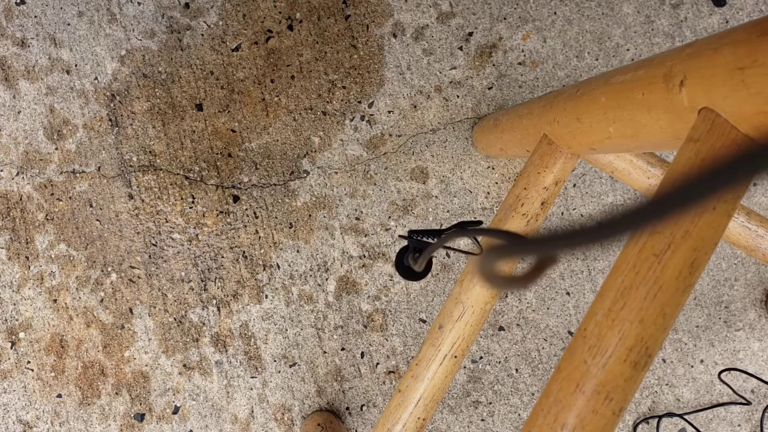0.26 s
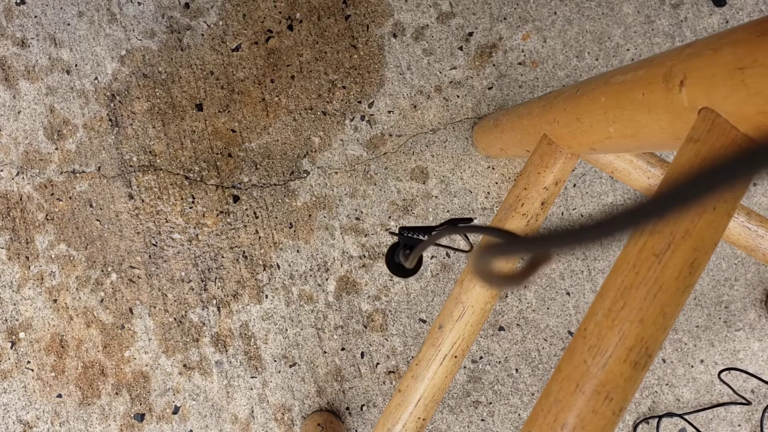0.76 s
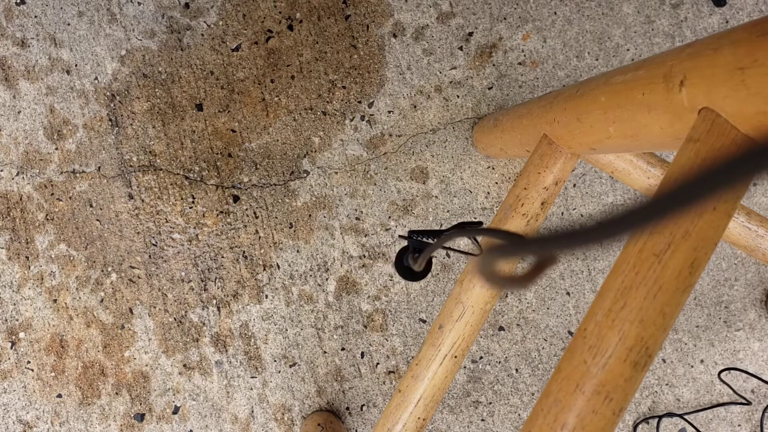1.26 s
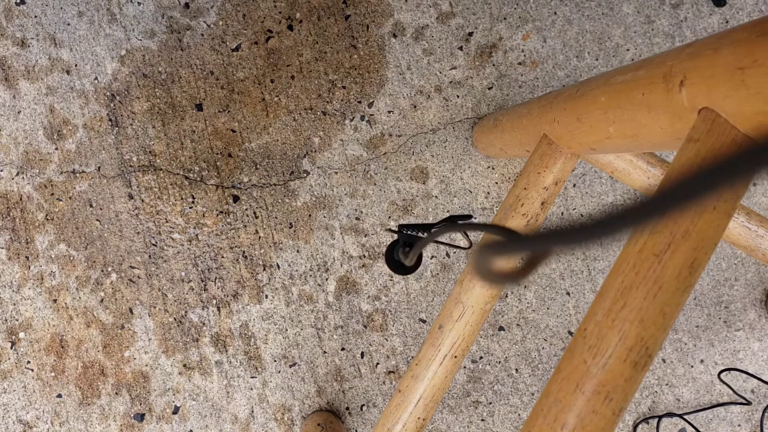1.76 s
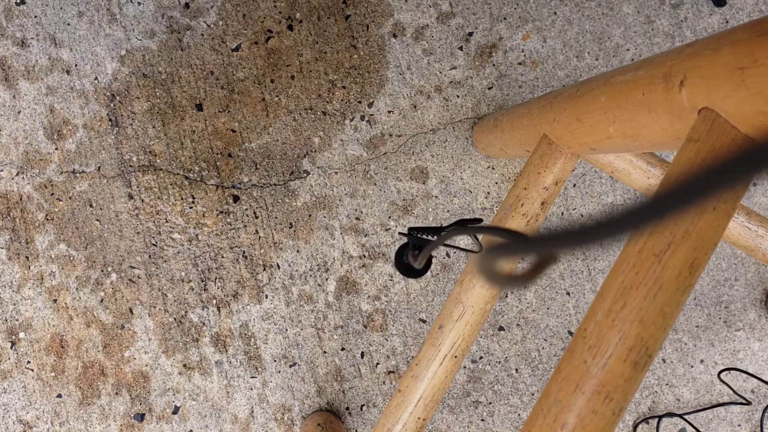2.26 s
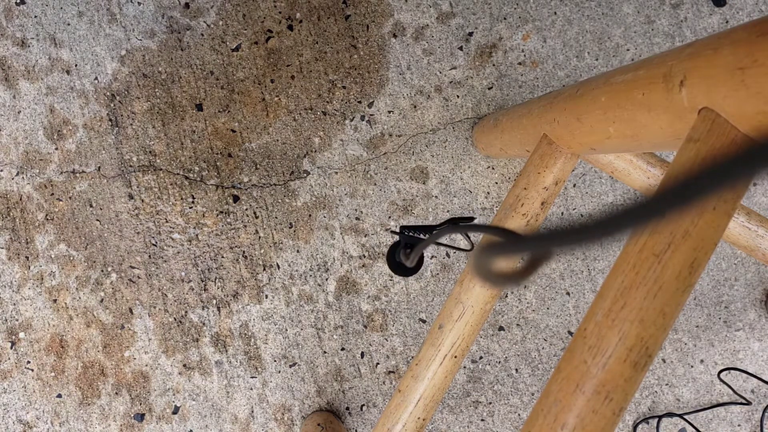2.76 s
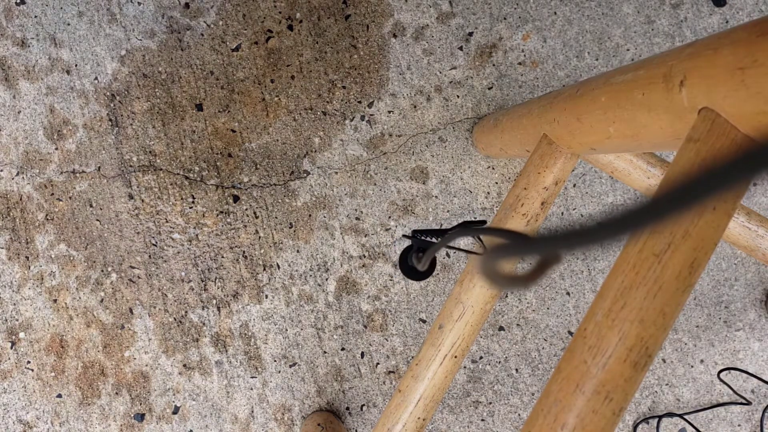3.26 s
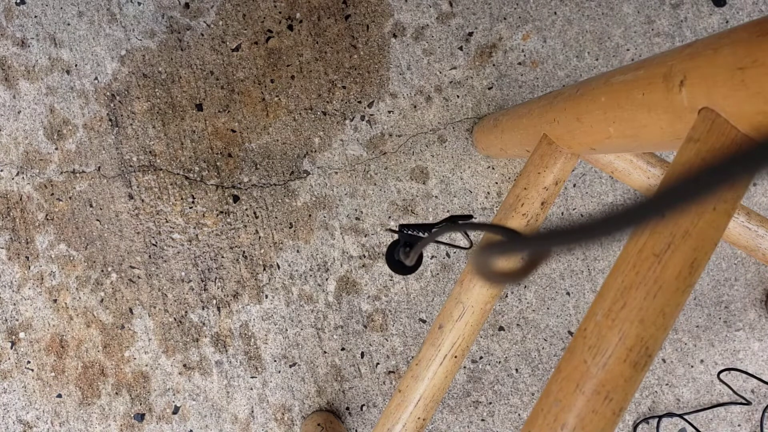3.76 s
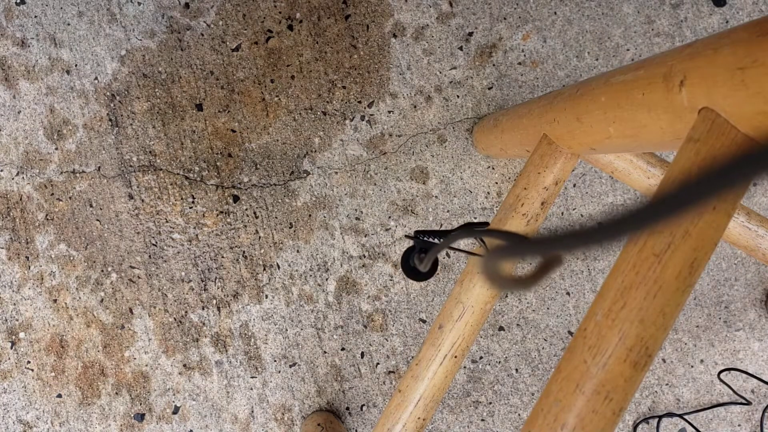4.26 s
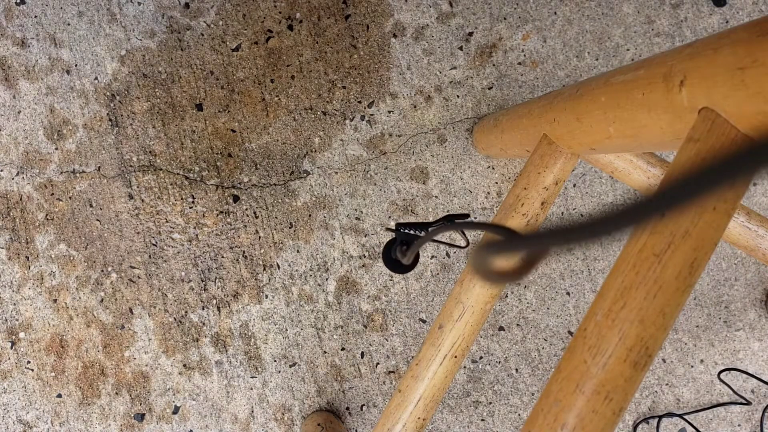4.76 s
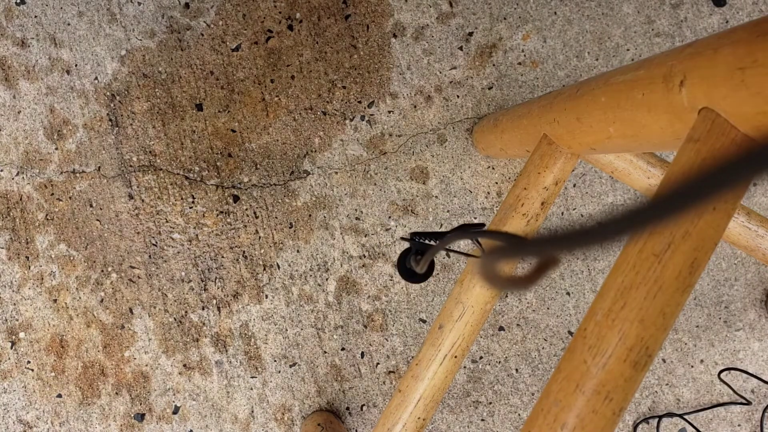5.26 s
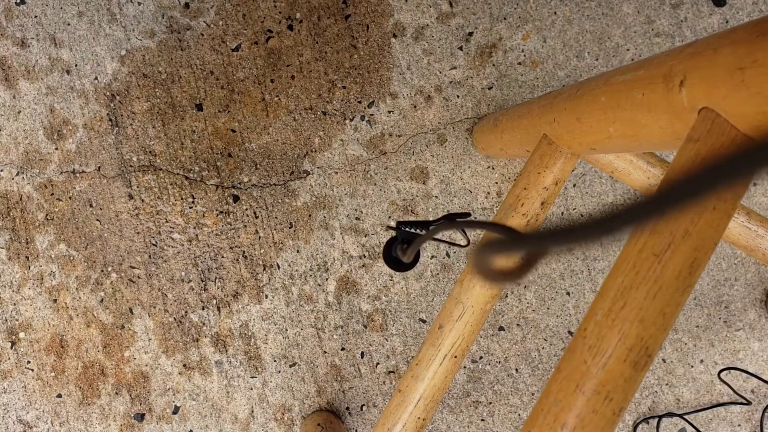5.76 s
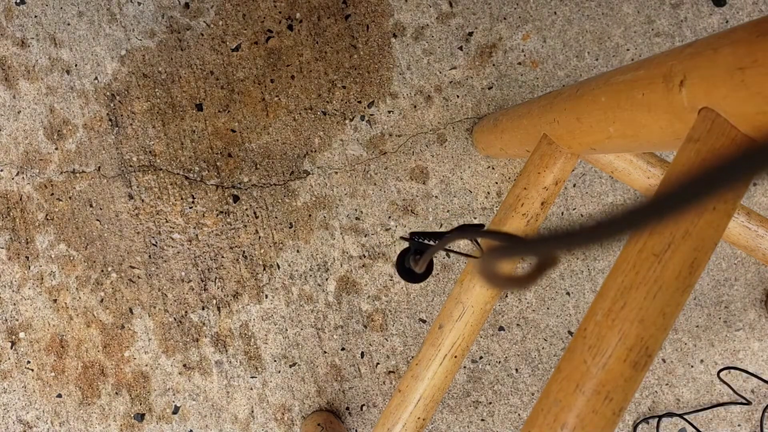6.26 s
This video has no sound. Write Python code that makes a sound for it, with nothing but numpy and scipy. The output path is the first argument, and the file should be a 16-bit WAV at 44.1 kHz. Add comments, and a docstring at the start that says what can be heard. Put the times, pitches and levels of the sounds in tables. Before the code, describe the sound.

A V8 idles with a lumpy, misfiring exhaust, then sags almost to a stall amid muffled pops before pulling up again.

```python
"""A V8 idles in a garage; one cylinder misfires now and then and thumps the exhaust.
The engine sags almost to a stall, a spark snaps at a loose plug lead, and the speed picks up again.
Each firing is a click that booms through the silencer's filter and barks through the pipes' resonances.
Around it lie pops, gas and a shell murmur, then filtered noise for the rush and the ticking valves,
a thin pulley tone that swells and fades, and the sparse echoes of the garage."""
import sys
import numpy as np
from scipy import signal
from scipy.fft import rfft, irfft, next_fast_len
from scipy.io import wavfile
from scipy.ndimage import uniform_filter1d

SR = 44100
rng = np.random.default_rng(int(sys.argv[2]) if len(sys.argv) > 2 else 0)


def generate_wav(signal):
    """Clip the signal to [-1, 1] and save it as 16-bit WAV at the path in sys.argv[1]."""
    frames = np.transpose(np.atleast_2d(signal))
    scaled = np.clip(frames, -1, 1) * 32767
    pcm = np.round(scaled).astype(np.int16)
    wavfile.write(sys.argv[1], SR, pcm)


N = 287091
T = np.arange(N) / SR  # s

# Engine speed before the sag of each misfire: (time [s], speed [firings/s])
ENGINE_SPEED = [(0.0, 71.13), (0.68, 71.25), (1.08, 72.05), (2.33, 71.89), (2.69, 71.24), (3.47, 71.81),
                (3.7, 61.69), (3.93, 54.4), (4.17, 45.47), (4.35, 42.68), (4.59, 38.23), (4.96, 34.14),
                (5.26, 39.1), (5.62, 39.62), (5.84, 34.91), (6.24, 36.85), (6.51, 45.2)]
# Strength of combustion, starved in the stumble and hard as the engine pulls up: (time [s], effort [dB])
COMBUSTION_EFFORT = [(0, 0.5), (3.45, 0), (3.75, -2.5), (4.03, 0), (4.13, -2), (4.6, -1), (5.05, -1.5),
                     (5.25, -1), (5.7, 0), (5.85, -0.5), (6.08, 3.5), (6.22, 2.5), (6.33, 5.5), (6.5, 6.5)]
# Cylinders in firing order: (puff lag [firings], puff size [ratio], crack lag [firings], crack level [dB],
# crack brightness [Hz], level of its echo in the pipe [dB], bank [0 left, 1 right])
CYLINDERS = [(.06, 1.06, -.1, 1.2, 172, 1.3, 0), (-.16, .38, -.123, 5.3, 2000, -27, 0),
             (.05, 1.49, .23, 13.1, 162, -12, 1), (-.12, 1.06, .231, 3.6, 726, -24, 1),
             (-.17, .98, .192, 13.6, 385, -29, 1), (.02, 1.34, -.016, .4, 159, -.5, 0),
             (-.19, 1.01, -.118, 4.8, 1100, -3.5, 0), (0, .64, .233, .7, 403, -25, 1)]
# Misfires of the weak cylinder; a negative share sucks gas back: (time [s], share of a full thump [ratio])
MISFIRES = [(.34, 1), (1.02, 1), (1.25, 1), (1.59, 1), (2.825, 1), (2.94, 1), (3.4, 1), (3.52, 1),
            (3.65, .75), (3.93, .5), (4.09, 1), (4.47, 1), (4.685, .5), (4.92, -.5), (5.15, .5)]
# Firings that fail or burn hard in the stumble: (time [s], puff size [ratio])
STUMBLES = [(3.612, 0.75), (3.679, 1.0), (3.723, 1.0), (3.819, 1.0), (3.863, 1.25), (3.956, 1.0),
            (3.987, 0.5), (4.073, 1.5), (4.093, 2.0), (4.138, 0.75), (4.182, 0.4), (4.208, 1.5),
            (4.237, 1.25), (4.275, 0.8), (4.468, 2.0), (4.682, 1.5), (4.913, 1.5), (5.039, 1.0),
            (5.774, 1.25), (5.864, 1.25), (5.98, 0.75), (6.036, 1.5), (6.089, 1.25), (6.144, 0.75),
            (6.385, 1.0), (6.499, 1.25)]
# How a layer's level grows: (per dB of speed [dB/dB], per dB of effort [dB/dB])
BOOM_LAW = (1, 0.88)
BARK_LAW = (2.55, 1.05)
RUSH_LAW = (1.55, 0.56)
VALVE_LAW = (0.11, 0.46)

# Boom spectrum of the silencer: (frequency [Hz], gain [dB])
SILENCER_BOOM = [(15, -21), (30, -14), (42, 8), (52, 12), (61, 16.5), (70, 11.5), (80, 8.5), (95, -1.5),
                 (120, -32.5), (160, -23)]
# Resonances of each bank's exhaust pipe: (frequency [Hz], width [Hz], gain [dB])
LEFT_PIPE = [(141, 110, 2.5), (199, 16.5, 18), (228.6, 23, 13), (339.3, 17.7, 9.5), (342.3, 57.6, 10.5),
             (432.3, 22, 5), (509.6, 17.2, 7), (637, 25, -6), (707.4, 23.7, 1.8), (803.4, 28, -2.7),
             (851, 41, -1.5), (995, 23, -9), (1098, 9.9, -15.5)]
RIGHT_PIPE = [(175.44, 16.04, 18.5), (175, 27.3, 15), (236.7, 21.4, 2.5), (260.8, 22, -0.8),
              (385.9, 15.3, 14.5), (391.4, 33.7, 14), (496, 21, -7), (618.5, 34, -2.5), (750, 6, -6),
              (794, 76, 2.5), (824, 98, -1), (910, 21, -5), (1113, 12, -15.5)]
# Thin ring of the tailpipe that both banks share: (frequency [Hz], width [Hz], gain [dB])
TAILPIPE = [(1449, 36, -12)]
# Bark level on top of what speed and effort give: (time [s], level [dB])
BARK_LEVEL = [(0, 1), (2.7, 1), (3.1, 1), (3.4, 1), (3.62, 1), (3.82, -4.5), (3.95, 1), (4.05, -4.5),
              (4.15, -8), (4.9, -3), (5.3, -0.5), (5.6, -0.5), (5.85, -4), (6.1, -1.5), (6.3, -3.5),
              (6.44, -2), (6.5, -1.5)]
# Unburnt fuel popping in the pipe: (time [s], level [dB])
POPS = [(3.366, -7), (3.524, 2), (3.598, -11), (3.648, -0.5), (3.733, -2), (3.766, -3), (3.824, -1.5),
        (3.875, -2), (3.908, -12), (3.958, -7.5), (3.996, -12), (4.028, -8), (4.057, -5.5), (4.211, -11),
        (4.28, -8), (4.581, -13.5), (4.636, -13.5), (4.921, -15), (5.279, -16), (5.347, -14), (5.49, -9.5),
        (5.64, -14), (5.983, -16), (6.065, -12), (6.2, -15), (6.283, -8.5), (6.347, -6), (6.478, 2.5)]
# Ring of the whole exhaust after a pop: (frequency [Hz], width [Hz], gain [dB])
POP_RING = [(159, 9.6, 17), (246, 30, 0), (323, 14, 12.5), (404, 18, 17.5), (431, 82, 1.5), (530, 35, -1.5),
            (702, 78, -1), (793, 24, 4), (905, 60, -5.5)]
# Hiss of escaping gas: (frequency [Hz], density [dB per Hz])
GAS_HISS = [(500, -26.5), (1100, -2), (1450, 9), (2000, -4.5), (3000, -5), (5000, -11.5), (10000, -22)]
# Modes of the silencer's shell: (frequency [Hz], width [Hz], gain [dB])
SILENCER_SHELL = [(112, 16, 3.5), (165.2, 18, -1), (195, 33, -5), (231, 22, 1), (317, 18, -6)]
# Level of the shell's murmur: (time [s], level [dB])
MURMUR_LEVEL = [(3.5, -44), (4.0, -39), (4.25, -47), (4.45, -37.5), (4.7, -47), (4.95, -52), (5.1, -42),
                (5.3, -35.5), (5.5, -34.5), (5.68, -41), (5.88, -44), (6.1, -39.5), (6.3, -34.5),
                (6.5, -33)]

# Sparks at the plug lead: (time [s], level [dB], centre of the sizzle [Hz])
SPARKS = [(4.448, -50, 7000), (4.6805, -39.5, 3020), (4.683, -42, 9000), (4.687, -46, 6500)]
# Tone of the snaps in the engine bay: (frequency [Hz], gain [dB])
SPARK_TONE = [(500, -4), (1100, -8), (1550, 4.0), (2200, -5.5), (3000, -9), (8000, -9.5), (11000, -17)]
# Ring of the engine block and covers: (frequency [Hz], width [Hz], gain [dB])
ENGINE_BLOCK = [(141, 59, -4), (175, 6.3, 4), (233, 14, 5), (335, 66, 7), (415, 12, 8), (583.7, 13.3, 7.5),
                (816, 32, 1), (1030, 190, -14.5), (1434, 42, -4.5), (1740, 55, -6.5), (1928, 63, -6),
                (2134, 132, -8.5), (3130, 130, -20.5)]
# Rush of fan and belts: (frequency [Hz], density [dB per Hz])
AIR_RUSH = [(100, 13), (400, 18.5), (1000, 18.5), (1700, 7.5), (2200, 8.5), (2900, 8.5), (3500, 5.5),
            (5000, 1.5), (7000, -1.5), (9000, -5), (11000, -13.5)]
# Decay of the garage: (frequency [Hz], time to fall by 60 dB [s])
GARAGE_DECAY = [(100, 0.72), (1000, 0.74), (4000, 0.032), (10000, 0.031)]

IDLE_HZ, START_FIRINGS = 71, .97  # smooth idle in firings per second; crank position at the start
# A lost power stroke slows the crank, starting just before its thump leaves the exhaust.
SAG_SHARE, SAG_S, SAG_LEAD_S = .04, .08, .06
WEAK_CYLINDER, THUMP_SIZE = 1, 2.15  # row of CYLINDERS; puff size of a full thump
ECHO_S = .00672  # round trip of a crack to the silencer and back
WHINE_PER_FIRING = 27.27  # cycles of the pulley tone in one firing
EDGE_HZ = 11300  # upper band edge of the recorder


def gain_of(db):
    """Amplitude ratio of a level in dB."""
    return 10 ** (np.asarray(db) / 20)


def evened(x):
    """Scales x to an RMS of one."""
    return x / np.sqrt(np.mean(x ** 2) + 1e-20)


def read(points, hz):
    """A spectrum table on a log-frequency axis."""
    f, value = np.transpose(points)
    return np.interp(np.log(hz + 1), np.log(f), value)


def curve(rows, s):
    """A table of (time, value) at the times s."""
    return np.interp(s, *np.transpose(rows))


def clicks(times, sizes):
    """A train of single-sample clicks."""
    places = np.clip(np.round(times * SR), 0, N).astype(int)
    return np.bincount(places, sizes, N + 1)[:N]


def coloured(x, points, top_hz=SR):
    """Causal filter with the given spectrum, rolled off steeply above top_hz."""
    size = 2 * next_fast_len(N // 2 + SR // 2)
    hz = np.fft.rfftfreq(size, 1 / SR)
    log_gain = np.log(gain_of(read(points, hz)))
    # the Hilbert transform of the log gain gives the minimum phase
    mirrored = np.r_[log_gain, log_gain[-2:0:-1]]
    response = np.exp(np.conj(signal.hilbert(mirrored)))[:len(hz)]
    roll_off = 1 + (hz / top_hz) ** 10
    return irfft(rfft(x, size) * response / roll_off, size)[:N]


def ring(x, modes):
    """Passes x through a set of damped resonances; neighbours swing in opposite senses."""
    t = T[:SR // 4]
    response = np.zeros(len(t))
    for k, (hz, width, db) in enumerate(modes):
        decay = np.exp(-np.pi * width * t)
        response += (-1) ** k * gain_of(db) * width * decay * np.sin(2 * np.pi * hz * t)
    return signal.oaconvolve(x, response)[:N]


def speed():
    """Firings per second: the crank sags after each misfire and recovers."""
    since = [np.maximum(T - s + SAG_LEAD_S, 0) / SAG_S for s, _ in MISFIRES]
    sag = sum(u * np.exp(1 - u) for u in since)
    return curve(ENGINE_SPEED, T) * (1 - SAG_SHARE * sag)


def crank():
    """Position of the crankshaft, counted in firings."""
    return START_FIRINGS + np.cumsum(speed()) / SR


def loudness(turn, law):
    """Level of a layer against the smooth idle, in dB, from speed and effort."""
    per_speed, per_effort = law
    speed_db = 20 * np.log10(np.gradient(turn) * SR / IDLE_HZ)
    return per_speed * speed_db + per_effort * curve(COMBUSTION_EFFORT, T)


def firings(turn):
    """Number of each firing, then its cylinder's columns."""
    number = np.arange(1, int(turn[-1]) + 1)
    return number, *np.array(CYLINDERS)[number % len(CYLINDERS)].T


def boom(turn, level_db=29.5, top_hz=125):
    """Each cylinder puffs into the silencer; when the weak one misfires, its small puff becomes a thump."""
    number, lag, size, *_ = firings(turn)
    times = np.interp(number + lag, turn, T)
    weak = np.flatnonzero(number % len(CYLINDERS) == WEAK_CYLINDER)
    for s, share in MISFIRES:
        size[weak[np.argmin(abs(times[weak] - s))]] = share * THUMP_SIZE
    # a stumble takes over the nearest firing, in time and in size
    for s, puff in STUMBLES:
        nearest = np.argmin(abs(times - s))
        times[nearest], size[nearest] = s, puff
    push = gain_of(np.interp(times, T, loudness(turn, BOOM_LAW)))
    return gain_of(level_db) * coloured(clicks(times, size * push), SILENCER_BOOM, top_hz)


def bark(turn, level_db=-63, slack_s=0.023, slack_db=-6, gas_db=-43, gas_s=0.017, soft_hz=450,
         sharp_at_db=-3, softening=0.81, round_db=-14, round_hz=260, uneven_db=1.0, low_hz=100, top_hz=1750):
    """Each pulse's sharp front, echo and spit of gas ring its bank's pipe; the uneven order makes the lope."""
    number, _, _, lag, crack_db, *_ = firings(turn)
    times = np.interp(number + lag, turn, T)
    # a misfire leaves the pipe slack, so the next few cracks are weaker
    slack = sum(np.exp(-((times - s - slack_s) / slack_s) ** 2) for s, _ in MISFIRES)
    uneven = uneven_db * rng.standard_normal(len(number))
    sizes = gain_of(crack_db + slack_db * slack + uneven)
    gas_decay = np.exp(-T[:SR // 20] / gas_s)
    banks = np.zeros((2, N))
    for k, (*_, bright_hz, echo_db, bank) in enumerate(CYLINDERS):
        own = sizes * (number % len(CYLINDERS) == k)
        fronts = clicks(times, own) + clicks(times + ECHO_S, own * gain_of(echo_db))
        gas = signal.oaconvolve(fronts, gas_decay)[:N] * rng.standard_normal(N)
        pulse = fronts + gain_of(gas_db) * gas
        banks[int(bank)] += signal.lfilter(*signal.butter(1, bright_hz, fs=SR), pulse)
    pipe = ring(banks[0], LEFT_PIPE) + ring(banks[1], RIGHT_PIPE) + ring(banks.sum(0), TAILPIPE)
    # weak combustion makes rounder fronts, and so a duller, fuller bark
    bark_db = loudness(turn, BARK_LAW) + curve(BARK_LEVEL, T)
    sharp = np.minimum(gain_of(softening * (bark_db - sharp_at_db)), 1)
    dull = signal.sosfiltfilt(signal.butter(2, soft_hz, fs=SR, output="sos"), pipe)
    body = gain_of(round_db) * signal.sosfiltfilt(signal.butter(2, round_hz, fs=SR, output="sos"), pipe)
    blend = dull + (1 - sharp) * body + sharp * (pipe - dull)
    band = signal.butter(4, [low_hz, top_hz], "bandpass", fs=SR, output="sos")
    return signal.sosfiltfilt(band, gain_of(level_db + bark_db) * blend)


def pops(level_db=-63, bright_hz=900, brightening=0.29):
    """Late burns knock the exhaust; the harder the pop, the brighter."""
    fronts = np.zeros(N)
    for s, db in POPS:
        knock = clicks(np.array([s]), [gain_of(db)]) + 1e-18  # tiny offset keeps the filter off denormals
        edge_hz = bright_hz * gain_of(brightening * db)
        fronts += signal.lfilter(*signal.butter(1, edge_hz, fs=SR), knock)
    return gain_of(level_db) * ring(fronts, POP_RING)


def spit(turn, level_db=-52, spit_s=0.0054, uneven_db=3):
    """Every stroke forces out a short, gritty spit of gas, which sinks away at low speed."""
    number, _, _, lag, *_ = firings(turn)
    sizes = gain_of(uneven_db * rng.standard_normal(len(number)))
    strokes = clicks(np.interp(number + lag, turn, T), sizes)
    gas = signal.oaconvolve(strokes, np.exp(-T[:SR // 20] / spit_s))[:N] * rng.standard_normal(N)
    return evened(coloured(gas, GAS_HISS)) * gain_of(level_db + loudness(turn, BARK_LAW))


def murmur(turn, uneven_db=4.0):
    """Each puff shakes the modes of the silencer's shell: a soft murmur that swells and dips."""
    number, lag, size, *_ = firings(turn)
    uneven = gain_of(uneven_db * rng.standard_normal(len(number)))
    knocks = clicks(np.interp(number + lag, turn, T), size * uneven)
    return gain_of(curve(MURMUR_LEVEL, T)) * evened(ring(knocks, SILENCER_SHELL))


def sparks(rise_s=0.0007, snap_s=0.015, crack_s=0.0014, crack_db=7, grain_db=4, sizzle_db=2):
    """Dry snaps of gritty noise with a resonant sizzle, a fast crack and a slower fade."""
    t, out = T[:SR // 8], np.zeros(N)
    decay = np.exp(-t / snap_s) + gain_of(crack_db) * np.exp(-t / crack_s)
    fade = (1 - np.exp(-t / rise_s)) * decay
    for s, db, hz in SPARKS:
        grain = gain_of(grain_db * rng.standard_normal(len(t)))
        grit = evened(rng.standard_normal(len(t)) * grain)
        sizzle = signal.lfilter(*signal.iirpeak(hz, 2, fs=SR), grit)
        out[round(s * SR):][:len(t)] += gain_of(db) * fade * (grit + gain_of(sizzle_db) * sizzle)
    return coloured(out, SPARK_TONE)


def valves(turn, level_db=-43, uneven_db=3, rattle_s=0.022, steady=0.84):
    """Two valves seat in each firing and rattle the block, over a steady bed of noise through its ring."""
    times = np.interp(np.arange(1, turn[-1], .5), turn, T)
    taps = clicks(times, gain_of(uneven_db * rng.standard_normal(len(times))))
    rattle = steady + signal.oaconvolve(taps, np.exp(-T[:SR // 20] / rattle_s))[:N]
    ticking = evened(ring(rattle * rng.standard_normal(N), ENGINE_BLOCK))
    return ticking * gain_of(level_db + loudness(turn, VALVE_LAW))


def whine(turn, level_db=-58, waver_db=2, swell_db=7, swell_at_s=2.14, swell_s=0.19, end_s=2.8, release_s=.12):
    """A thin tone from a belt-driven pulley, locked to the crank: it wavers, swells once and dies away."""
    waver = evened(uniform_filter1d(rng.standard_normal(N), SR // 12))
    swell = np.exp(-((T - swell_at_s) / swell_s) ** 2)
    release = np.exp(-np.maximum(T - end_s, 0) / release_s)
    level = release * gain_of(level_db + swell_db * swell + waver_db * waver)
    return level * np.sin(2 * np.pi * WHINE_PER_FIRING * turn)


def rush(turn, level_db=-42.5, surge_db=1.0):
    """Air from fan and belts: coloured noise, surging once in each engine cycle."""
    surge = np.sin(2 * np.pi * turn / len(CYLINDERS))
    air = evened(coloured(rng.standard_normal(N), AIR_RUSH))
    return air * gain_of(level_db + loudness(turn, RUSH_LAW) + surge_db * surge)


def garage(x, first_s=0.00522, spacing=20):
    """Sparse reflections of random sign, each band dying at its own speed; spacing in samples."""
    count = SR // 40
    times = (np.arange(count) + rng.random(count)) * spacing / SR + first_s
    taps = clicks(times, rng.choice([-1., 1.], count))[:SR // 2]
    hz, t, z = signal.stft(taps, SR, nperseg=256)
    decay = gain_of(-60 * t / read(GARAGE_DECAY, hz)[:, None])
    tail = signal.istft(z * decay, SR, nperseg=256)[1]
    return signal.oaconvolve(x, tail / np.linalg.norm(tail))[:N]


def scene(pipe_room_db=-21, spark_room_db=-7):
    """Exhaust and engine bay, with the pipe and the sparks echoing in the garage."""
    turn = crank()
    pipe = bark(turn) + pops()
    snaps = sparks()
    exhaust = boom(turn) + pipe + spit(turn) + murmur(turn)
    engine_bay = snaps + valves(turn) + whine(turn) + rush(turn)
    room = garage(gain_of(pipe_room_db) * pipe + gain_of(spark_room_db) * snaps)
    return (exhaust + engine_bay + room)[None]


def record(dry, low_hz=14):
    """The recorder's band limits."""
    high_pass = signal.butter(2, low_hz, "high", fs=SR, output="sos")
    dry = signal.sosfiltfilt(high_pass, dry, padtype="even", padlen=SR // 4)
    low_pass = signal.firwin(255, EDGE_HZ, window=("kaiser", 9), fs=SR)
    return signal.oaconvolve(dry, low_pass[None], "same")


dry = scene()
out = record(dry)
generate_wav(out)
```